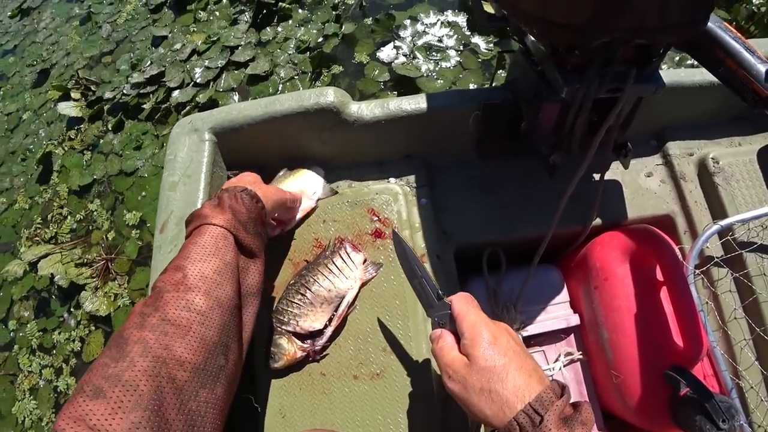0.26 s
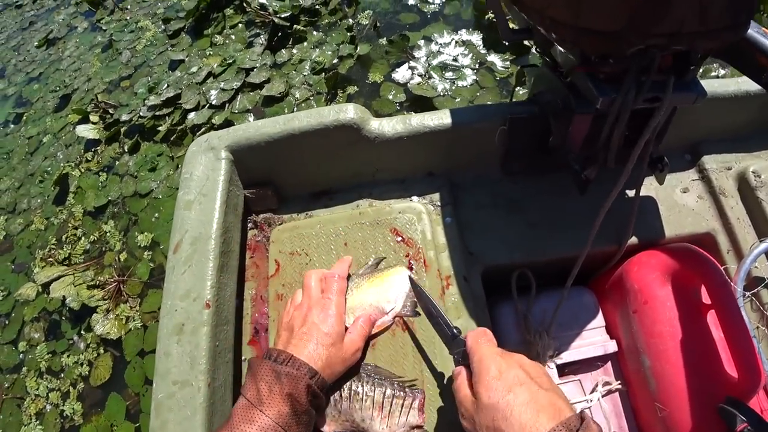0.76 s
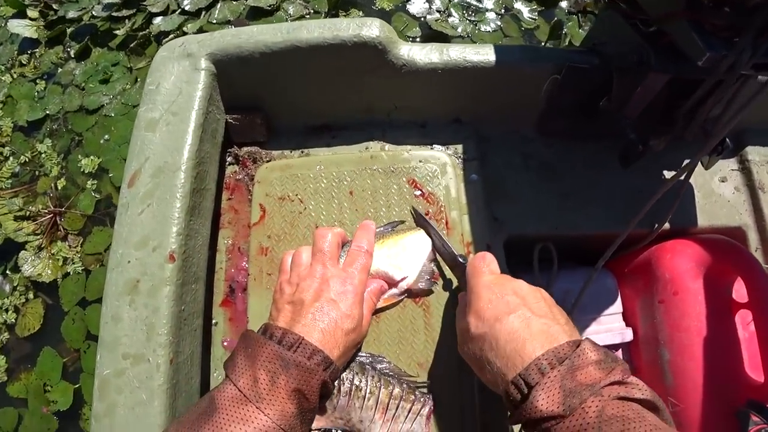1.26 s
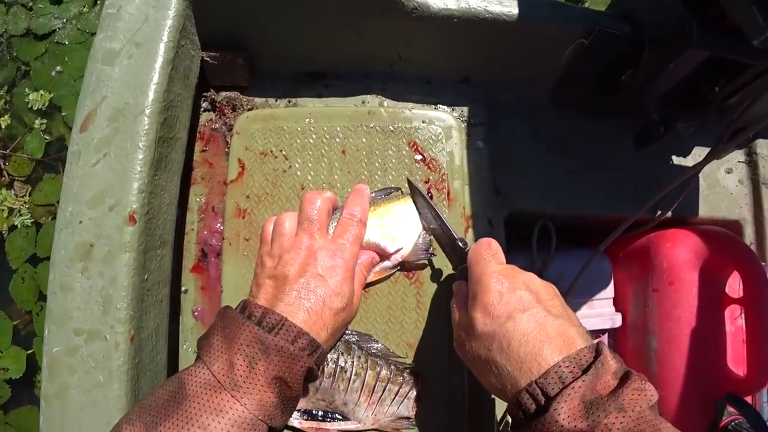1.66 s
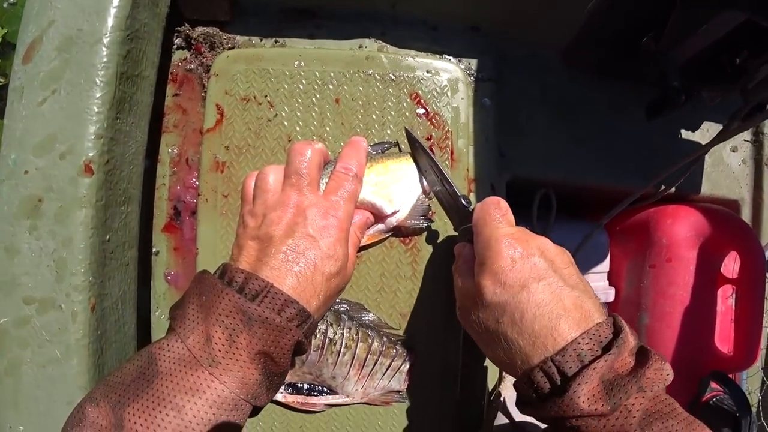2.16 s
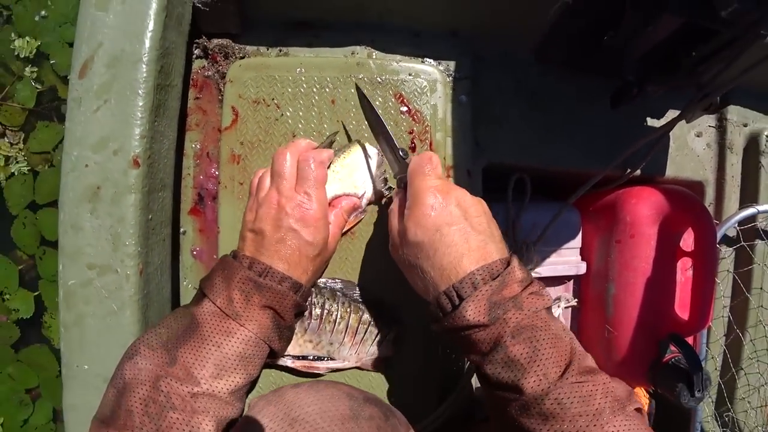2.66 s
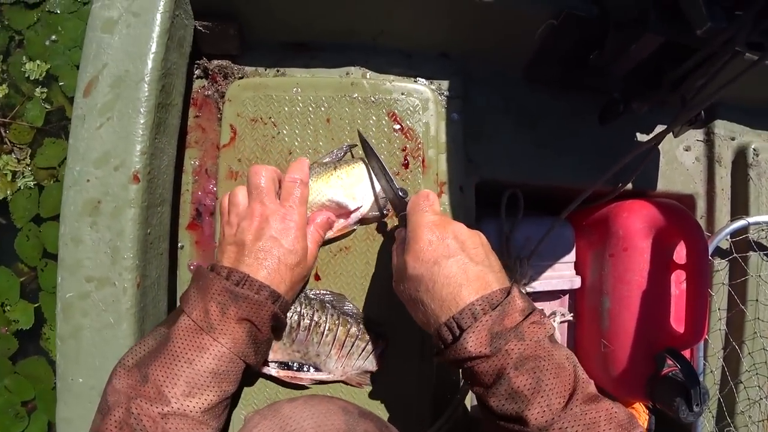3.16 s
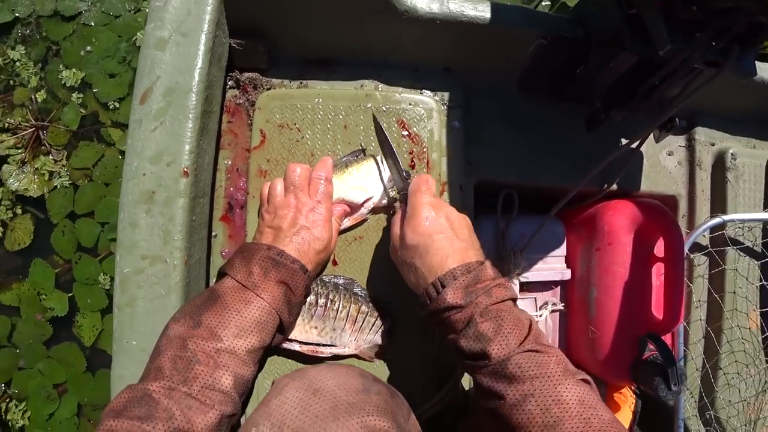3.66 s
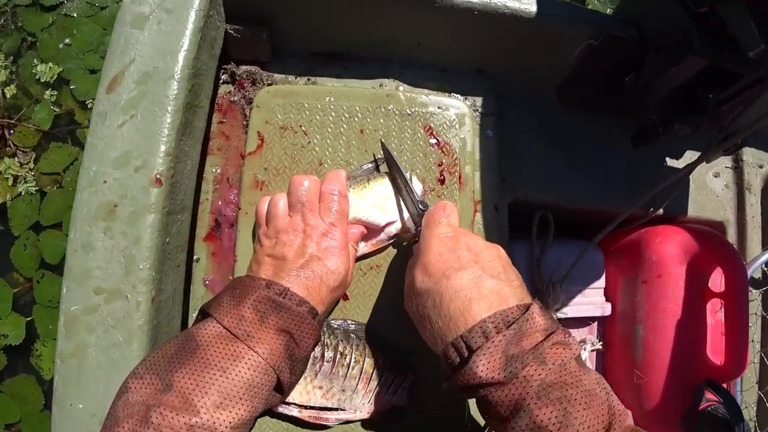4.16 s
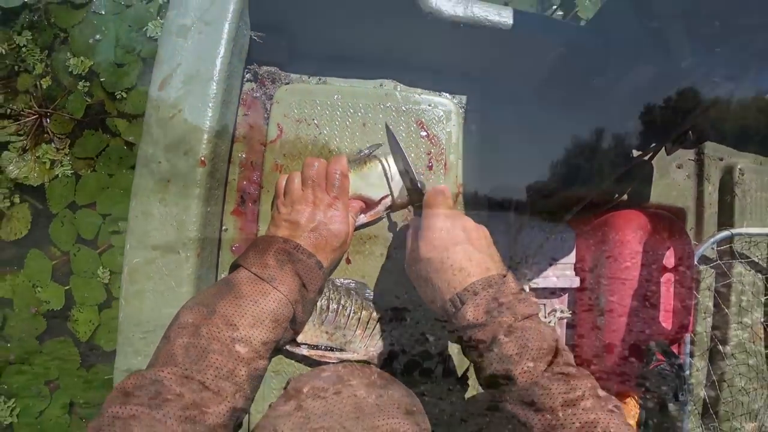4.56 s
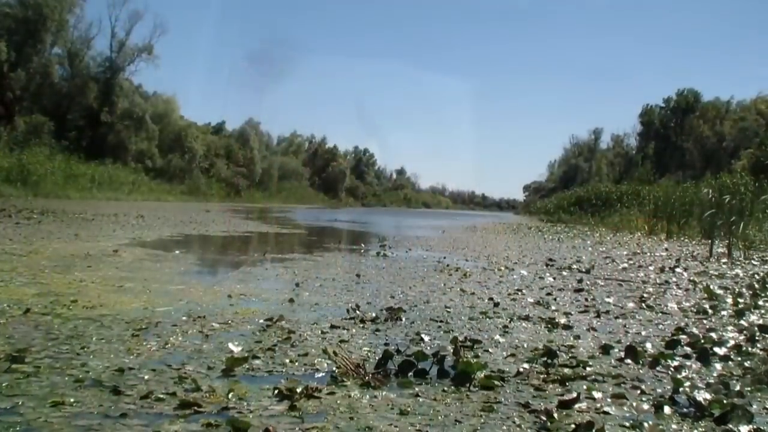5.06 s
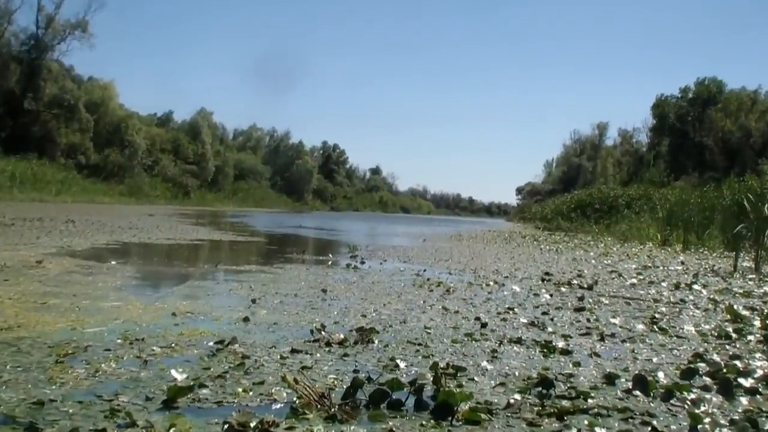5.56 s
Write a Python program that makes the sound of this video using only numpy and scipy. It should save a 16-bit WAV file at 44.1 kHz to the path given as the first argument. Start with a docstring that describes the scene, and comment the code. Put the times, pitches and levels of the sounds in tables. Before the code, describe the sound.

Close to the microphone, hands and a knife work a fish on a hollow plastic boat deck: dull booms, clicks, wet rasps and tiny crackles. The hardest knocks come in bursts roughly a second apart, over faint open marsh air and low wind buffeting. Near the end a steady wash of water fades in, with a few soft rustles and last knocks.

```python
"""On the hollow plastic deck of a small boat, a fish is cut close to the microphone.
Still marsh air and buffeting wind are shaped noise; near the end a louder wash of water along the hull
rises, as if moving through lily pads, with a few soft treble rustles. The knife and hands rub (noise through
the deck and a wet rasp), crackle (tiny snaps), tick (short rings and cracks) and thump (ringing deck modes)."""
import sys
import numpy as np
from scipy import signal
from scipy.fft import rfft, irfft
from scipy.io import wavfile
from scipy.ndimage import uniform_filter1d

SR = 44100
rng = np.random.default_rng(int(sys.argv[2]) if len(sys.argv) > 2 else 0)


def output_pcm(signal):
    """Save a mono or channel-first signal as 16-bit PCM at the path in sys.argv[1].

    Samples are clipped to [-1, 1] before scaling.
    """
    pcm = np.clip(np.atleast_2d(signal).T, -1, 1) * 32767
    wavfile.write(sys.argv[1], SR, np.round(pcm).astype(np.int16))


def natural_amplitude(level_db):
    """Convert a level in decibels to a linear amplitude factor, elementwise."""
    exponent = np.asarray(level_db, float) / 20
    return 10 ** exponent


N = 256072  # length in samples


def evened(x):
    """Scales a sound to rms 1."""
    return x / np.sqrt(np.mean(x ** 2) + 1e-20)


def read(points, hz):
    """Reads a curve of (Hz, value) points on a log-frequency axis."""
    f, value = np.transpose(points)
    return np.interp(np.log(hz + 1), np.log(f + 1), value)


def level(rows):
    """Gain over time from rows of (seconds, dB); nearly silent outside the rows."""
    rows = np.asarray(rows)
    return natural_amplitude(np.interp(np.arange(N) / SR, rows[:, 0], rows[:, 1], -120, -120))


def add(mix, s, sound):
    """Mixes a sound in at time s, in seconds."""
    part = mix[round(s * SR):][:len(sound)]
    part += sound[:len(part)]


def coloured(x, spectrum):
    """Filters x by a spectrum in dB."""
    hz = np.fft.rfftfreq(x.shape[-1], 1 / SR)
    return irfft(rfft(x) * natural_amplitude(read(spectrum, hz)), x.shape[-1])


def noise(spectrum, same, patchy_db, lean=((1, 0), (2, 0)), size=1024):
    """Two channels of random short-time spectra, louder and softer in drifting patches."""
    hz = np.fft.rfftfreq(size, 1 / SR)
    a, b, c, d, patches = rng.standard_normal((4 * N // size + 5, len(hz), 5)).T
    patches = uniform_filter1d(patches, size=8, axis=0)
    patches = evened(uniform_filter1d(patches, size=8, axis=1))
    like = np.clip(read(same, hz), -1, 1)[:, None]
    left = a + 1j * b
    right = like * left + np.sqrt(1 - like ** 2) * (c + 1j * d)
    tilt = read(lean, hz) / 2  # half the left-right difference goes to each channel
    z = np.array([left, right]) * natural_amplitude(read(spectrum, hz)[:, None] + patchy_db * patches)
    z *= natural_amplitude([tilt, -tilt])[:, :, None]
    return evened(signal.istft(z, nperseg=size, noverlap=3 * size // 4)[1][:, :N])


# Colour of the still marsh. Each row: frequency in Hz, relative level in dB per Hz.
AIR_COLOUR = [(59, -17.5), (100, -5.5), (141, -8.5), (360, -15.5), (589, -18.5), (1000, -24.5), (4880, -32),
              (12800, -47), (15500, -50), (16500, -69)]
# How alike left and right are. Each row: frequency in Hz, likeness from 0 to 1.
AIR_LIKENESS = [(60, 0.96), (240, 1), (950, 0.22), (3770, 0.52), (15000, 0.37)]


def marsh_air():
    """Steady, faint noise of the open air, more alike in both channels at low pitches."""
    return natural_amplitude(-44.5) * noise(AIR_COLOUR, AIR_LIKENESS, patchy_db=2.0)


# Strength of the wind. Each row: time in seconds, level in dB.
GUSTS = [(0.0, -46), (0.34, -44), (0.55, -30.5), (0.92, -39.5), (1.62, -50), (1.96, -32.5), (2.42, -37),
         (2.83, -62), (3.43, -59), (3.7, -62), (3.95, -68), (4.3, -39.5), (4.45, -35.5), (4.77, -40),
         (5.06, -38), (5.71, -41.5), (5.81, -38)]
# Colour of the wind. Each row: frequency in Hz, relative level in dB per Hz.
WIND_COLOUR = [(8.8, -44), (15, 1), (49, -4), (161, -14), (198, -18), (231, -9.5), (260, -14.5), (340, -46),
               (570, -120)]


def wind():
    """Wind buffets the microphone ports: low noise that swells and sinks with the gusts."""
    likeness = [(30, 0.6), (120, 0.67)]  # (Hz, left-right likeness)
    return level(GUSTS) * noise(WIND_COLOUR, likeness, patchy_db=2.0, size=2048)


# Colour of the water. Each row: frequency in Hz, relative level in dB per Hz.
WASH_COLOUR = [(35, -37), (60, -9.5), (96, 1.5), (190, -9.5), (283, -3.5), (375, -11.5), (1370, -15.5),
               (6150, -26.5), (9840, -35.5), (15400, -38.5), (16500, -53)]
# Loudness of the water. Each row: time in seconds, level in dB.
WASH_LEVEL = [(4.2, -54), (4.338, -46), (4.508, -36), (5.036, -32.5), (5.81, -32.5)]
# How alike left and right are. Each row: frequency in Hz, likeness from 0 to 1.
WASH_LIKENESS = [(60, 1), (180, 0.99), (550, 0.99), (1650, 0.93), (4970, 0.13), (15000, 0.033)]
# Balance of the two sides. Each row: frequency in Hz, left minus right in dB.
WASH_LEAN = [(60, -8), (240, -2), (950, -1.5), (3770, -0.5), (15000, -2.5)]


def wash():
    """Water runs along the hull: wide, fairly even noise that rises near the end."""
    return level(WASH_LEVEL) * noise(WASH_COLOUR, WASH_LIKENESS, patchy_db=0.7, lean=WASH_LEAN)


# Brief treble rustles over the water. Each row: start in seconds, level at the peak in dB, length in seconds.
RUSTLES = [(4.568, -40, 0.039), (4.647, -44.5, 0.05), (5.255, -38, 0.046), (5.306, -46, 0.047)]


def rustles():
    """Soft bell-shaped swells of noise in a narrow treble band."""
    band = signal.butter(2, [5200, 6900], "bandpass", fs=SR, output="sos")
    hiss = evened(signal.sosfilt(band, rng.standard_normal((2, N))))
    t = np.arange(N) / SR
    swells = sum(natural_amplitude(db) * np.exp(-(2 * (t - s) / length - 1) ** 2 * 2) for s, db, length in RUSTLES)
    return hiss * swells


# Modes (natural pitches) of the deck. Each row: frequency in Hz, relative level in dB,
# basic time in seconds to die away by 60 dB, before the factor given to ring().
DECK_MODES = [(54.7, -12.5, 0.23), (70, -17, 0.42), (88, 7, 0.13), (202, -25, 0.28), (236.2, -14, 0.32),
              (277.7, 0, 0.15), (355, 5, 0.15), (431, -1, 0.14), (465, 8, 0.028), (568, 1.5, 0.04),
              (731, 0.5, 0.078), (819.5, -9, 0.1), (934, -5, 0.077), (1013, -6.5, 0.045), (1125, 8, 0.011),
              (1590, -8, 0.036), (1950, -3.5, 0.02)]


def ring(weight_db, factor, signs, hand=0):
    """The deck modes die away after one blow; the hand share of the decay comes late and fast."""
    hz, db, t60 = np.transpose(DECK_MODES)[:, :, None]
    t = np.arange(SR // 4) / SR
    age = t / (t60 * factor)
    fall_db = 60 * ((1 - hand) * age + hand * (age / 0.42) ** 2)
    modes = signs * natural_amplitude(db + weight_db - fall_db) * np.sin(2 * np.pi * hz * t)
    return modes.sum(0)


def stroke(start, hardest, end, ends_db):
    """Gain of one slide: rounded at its hardest moment, falling to both ends, silent outside."""
    away = np.interp(np.arange(N) / SR, [start, hardest, end], [1, 0, 1], np.inf, np.inf)
    return natural_amplitude(ends_db * away ** 1.16)


# Colour of the wet rasp. Each row: frequency in Hz, relative level in dB per Hz.
RASP_COLOUR = [(500, -6), (900, -1), (1350, -6), (1850, -3), (2100, -8), (2400, -4.5), (2800, -11),
               (3800, -9), (4800, -12), (6300, -13), (8000, -18.5), (12000, -26), (16000, -53)]
# Fish and hands sliding. Each row: start, hardest moment and end in seconds,
# then level through the deck and level of the wet rasp in air, both in dB.
STROKES = [(0.087, 0.14, 3.5, -69, -51), (0.417, 0.509, 0.63, -30.5, -39.5),
           (0.554, 0.62, 0.8, -35.5, -40.5), (0.613, 0.7, 0.76, -32.5, -66),
           (1.228, 1.25, 1.38, -30.5, -38.5), (1.692, 1.691, 1.8, -34.5, -54),
           (2.306, 2.414, 2.93, -39, -45.5), (2.428, 2.441, 2.48, -28.5, -52),
           (2.483, 2.51, 2.56, -23, -30), (2.55, 2.578, 2.586, -18.5, -34), (2.713, 2.739, 2.89, -32, -51),
           (3.118, 3.148, 3.215, -34, -73), (3.257, 3.487, 3.7, -30.5, -43),
           (3.475, 3.484, 3.512, -26, -28.5), (3.613, 3.642, 3.71, -36, -45.5),
           (4.263, 4.325, 4.54, -30, -40), (4.315, 4.322, 4.32, -16, -30)]
DECK_ENDS_DB, RASP_ENDS_DB = -19.5, -23  # both ends of a stroke, against its hardest moment


def rubbing():
    """Uneven slips shake the deck; the rasp flickers in patches as scales catch."""
    jolts = np.minimum(rng.exponential(1, (2, N // 128 + 1)), 3)
    grip_db = 3.3 * jolts.repeat(128, 1)[:, :N]
    # sliding barely moves the whole hull, so the lowest modes stay weak
    slide_colour = [(100, -35), (200, 15.0), (450, 8.5), (1000, -16.0)]
    upper_db = read(slide_colour, np.array(DECK_MODES)[:, :1])
    slips = rng.standard_normal(N) * natural_amplitude(grip_db[0])
    body = evened(signal.oaconvolve(slips, ring(upper_db, 0.34, 1))[:N])
    rasp = noise(RASP_COLOUR, AIR_LIKENESS, patchy_db=2.2, size=256)[0]
    rasp = evened(rasp * natural_amplitude(0.4 * grip_db[1]))
    out = np.zeros(N)
    for *times, deck_db, rasp_db in STROKES:
        out += natural_amplitude(deck_db) * stroke(*times, DECK_ENDS_DB) * body
        out += natural_amplitude(rasp_db) * stroke(*times, RASP_ENDS_DB) * rasp
    return out


# Bands of the wet snaps. Each entry: centre frequency in Hz.
SNAP_BANDS = (1100, 1850, 2100, 2450, 3800, 4700, 6300, 11500)


def crackle():
    """Scales catch during the strokes: tiny snaps in narrow bands, following the rasp's level."""
    snaps_per_s, snaps_db = 300, -3  # rate over all bands together; level against the rasp
    busy = sum(natural_amplitude(rasp_db) * stroke(*times, RASP_ENDS_DB) for *times, _, rasp_db in STROKES)
    out = np.zeros(N)
    for hz in SNAP_BANDS:
        when = rng.random(N) < snaps_per_s / len(SNAP_BANDS) / SR
        spread_db = 1.55 * np.minimum(rng.exponential(1, N), 2)
        sizes = when * natural_amplitude(snaps_db + 0.43 * read(RASP_COLOUR, hz) + spread_db)
        swells = signal.oaconvolve(sizes, signal.windows.hann(200))[:N]
        band = signal.butter(2, [0.9 * hz, 1.1 * hz], "bandpass", fs=SR, output="sos")
        out += swells * evened(signal.sosfilt(band, rng.standard_normal(N)))
    return busy * out


# Colour of a click's crack. Each row: frequency in Hz, relative level in dB per Hz.
CRACK_COLOUR = [(590, -61.5), (1000, 0), (1780, 4.5), (5050, 1), (7610, -2.5), (9290, -11.5), (11000, -9),
                (15500, -20), (16800, -60)]
# Blade, scales and bones clicking. Each row: start in seconds, peak level in dB, pitch of the ring in Hz,
# share of ring against crack from 0 to 1, time in seconds for the click's envelope to fall by 60 dB.
TICKS = [(0.2682, -28, 5600, 0.43, 0.02), (0.345, -38, 10500, 0.37, 0.019), (0.5, -25, 2440, 0.38, 0.03),
         (0.507, -26, 5850, 0.44, 0.039), (0.55, -26, 5500, 0.2, 0.0058), (0.604, -35, 1960, 0.8, 0.26),
         (0.734, -32.5, 3130, 0.65, 0.021), (0.761, -32, 2600, 0.4, 0.0294),
         (0.8962, -31.5, 2860, 0.3, 0.032), (1.2258, -5, 7980, 0.23, 0.012),
         (1.2265, -13, 1720, 0.5, 0.021), (1.243, -31.5, 2410, 0.9, 0.3), (1.512, -33, 7160, 0.72, 0.016),
         (1.598, -33.5, 1590, 0.56, 0.02), (1.6925, -27.5, 1490, 0.52, 0.03),
         (1.724, -35, 9150, 0.23, 0.02), (1.776, -35, 1860, 0, 0.035), (2.039, -28.5, 3220, 0.2, 0.024),
         (2.076, -32, 1410, 0.35, 0.063), (2.279, -29.5, 1800, 0.34, 0.028),
         (2.428, -9.5, 6090, 0.57, 0.02), (2.4284, -21, 9570, 0.84, 0.0082),
         (2.4289, -8.5, 1564, 0.78, 0.017), (2.4618, -17, 4500, 0.24, 0.011), (2.488, -17, 1010, 0.9, 0.1),
         (2.489, -22.5, 3800, 0.4, 0.04), (2.503, -23, 3880, 0.66, 0.081), (2.556, -31, 3860, 0.7, 0.04),
         (2.574, -25, 3440, 0.43, 0.025), (2.6033, -24, 11620, 0.52, 0.015),
         (2.6128, -30, 1950, 0.7, 0.024), (2.63, -29, 3180, 0.37, 0.017), (2.661, -36, 1690, 0.5, 0.02),
         (2.684, -34.5, 4900, 0, 0.015), (2.772, -35, 4560, 0.05, 0.043), (2.9676, -25, 4280, 0.5, 0.017),
         (2.971, -27.5, 1400, 0.4, 0.027), (3.3402, -29.5, 1650, 0.44, 0.026),
         (3.3693, -35, 1630, 0.37, 0.03), (3.4057, -31.5, 2070, 0.34, 0.021),
         (3.4466, -29.5, 4350, 0.45, 0.025), (3.4742, -17, 1390, 0, 0.047),
         (3.4804, -10, 1780, 0.67, 0.024), (3.48, -18, 3750, 0.72, 0.035), (3.491, -33.5, 3260, 0.6, 0.038),
         (3.5227, -15, 1180, 0.44, 0.026), (3.5234, -20.5, 10300, 0.6, 0.0074),
         (3.541, -27, 2160, 0.6, 0.016), (3.543, -33, 4400, 0.8, 0.016), (3.5655, -40, 3400, 0.6, 0.018),
         (3.659, -33.5, 11000, 0.14, 0.025), (3.7678, -35, 1800, 0.5, 0.039),
         (3.983, -34, 2040, 0.2, 0.025), (4.015, -48, 11500, 0.6, 0.012),
         (4.1088, -35.5, 1540, 0.35, 0.026), (4.1934, -44, 8600, 0.7, 0.014),
         (4.2378, -41, 8000, 0.5, 0.012), (4.32, -13, 2260, 0.38, 0.037), (4.327, -12.5, 1054, 0.66, 0.038),
         (4.341, -21, 1950, 0.3, 0.025), (4.383, -28, 1950, 0, 0.015), (4.508, -25.5, 4860, 0.24, 0.028),
         (4.821, -26.5, 1410, 0.95, 0.036), (5.0207, -20, 2080, 0.5, 0.022),
         (5.4857, -25, 2380, 0.45, 0.029)]


def ticks():
    """Each click is a burst of wide crack plus a short ring of its own pitch."""
    clean_s = 0.06  # from this fall time on, the ring is all fuzzy
    out, t = np.zeros(N), np.arange(4096) / SR
    bursts = rng.standard_normal((len(TICKS), 2, len(t)))
    for (s, db, hz, share, t60), burst in zip(TICKS, bursts):
        shape = natural_amplitude(-60 * t / t60) * np.minimum(t / (0.074 * t60), 1) ** 2
        r = np.exp(-np.pi * (300 + 0.074 * hz) / SR)  # higher rings are wider
        poles = [1, -2 * r * np.cos(2 * np.pi * hz / SR), r * r]
        fuzzy = signal.lfilter([1, 0, -1], poles, burst[0] * shape ** 2)
        fuzzy = signal.lfilter([1, 0, -1], poles, fuzzy)
        # one short tap rings clean, a longer contact is a chain of slips
        fuzz = 1 - share ** 2 * (1 - min(t60 / clean_s, 1) ** 2)
        clean = shape * np.sin(2 * np.pi * hz * t)
        tone = fuzz * fuzzy / abs(fuzzy).max() + (1 - fuzz) * clean
        # the contact chatters from millisecond to millisecond
        rattle = natural_amplitude(2.7 * burst[0, :len(t) // 64].repeat(64))
        crack = coloured(burst[1], CRACK_COLOUR) * shape * rattle
        click = share * tone / abs(tone).max() + (1 - share) * crack / abs(crack).max()
        add(out, s, natural_amplitude(db) * click / abs(click).max())
    return out


# Blows on the deck; the lowest rock the whole hull. Each row: start in seconds, peak level of the boom in dB,
# frequency in Hz of the mode nearest the struck spot, hardness (peak of the upper modes against the boom)
# in dB, factor on how long the deck rings.
THUMPS = [(0.27, -27, 288, -3, 0.45), (0.333, -28, 57.3, -27, 1.3), (0.462, -26, 46, -16, 0.58),
          (0.877, -21, 46, -44, 0.13), (1.059, -29, 70, -26, 0.74), (1.214, -21.5, 272, -10, 0.5),
          (1.2269, -10.5, 278, -10, 0.46), (1.237, -22.5, 347, 7.5, 1.85), (1.251, -17, 223, -9, 0.56),
          (1.275, -22, 240, -10, 0.66), (1.343, -26.5, 286, -30, 0.42), (1.506, -25, 88, -20, 0.86),
          (1.516, -25, 194, -29, 0.32), (1.596, -25.5, 247, -7.5, 0.41), (1.693, -16.5, 275, -1.5, 0.25),
          (1.731, -28, 240, -6, 0.79), (1.775, -27.5, 381, 2, 0.89), (2.04, -26.5, 297, -2, 0.62),
          (2.084, -28.5, 366, -3.5, 0.86), (2.089, -26, 54, -8, 0.49), (2.228, -29, 46.4, -22, 0.61),
          (2.282, -26, 266, -1, 0.44), (2.432, -25, 365, -14, 0.3), (2.48, -14.5, 234, -12, 0.66),
          (2.499, -9.5, 268, -18, 0.93), (2.516, -6.5, 272, -13, 0.45), (2.535, -14.5, 250, -3.5, 0.7),
          (2.575, -18, 238, 4.5, 0.89), (2.598, -24.5, 253, -1.5, 0.83), (2.73, -36, 278, 7, 0.23),
          (2.755, -33.5, 315, 3, 0.74), (2.969, -28, 90, -20, 1.6), (2.976, -15, 252, -10.5, 0.4),
          (3.173, -27, 200, -5.5, 0.33), (3.213, -23, 94, -30, 0.6), (3.228, -31.5, 172, 1.5, 0.34),
          (3.34, -24, 228, 8, 0.17), (3.368, -28.5, 251, 1.5, 0.23), (3.405, -27, 355, -1, 0.23),
          (3.475, -22.5, 347, 12.5, 1.6), (3.476, -19.5, 86, -30, 0.84), (3.487, -6.5, 275, -21, 0.67),
          (3.5165, -10, 277, -6, 0.71), (3.528, -12, 285, -10, 0.28), (3.604, -30, 272, 3.5, 0.32),
          (3.648, -30, 253, -1, 0.6), (3.767, -27.5, 245, 5.5, 0.36), (3.941, -30.5, 70, -30, 0.13),
          (3.982, -32, 173, 7.5, 0.39), (4.001, -23, 272, -12, 0.21), (4.13, -28.5, 262, -7.5, 0.22),
          (4.321, -18.5, 62.3, -45, 0.74), (4.3193, -15, 280, 7, 1.55), (4.326, -14.5, 350, 1, 0.78),
          (4.335, -6, 232, -5, 0.31), (4.346, -11.5, 270, -7, 0.29), (4.364, -19.5, 350, -1, 0.33),
          (4.3842, -14, 274, -6.5, 0.36), (4.512, -31, 236, -1, 0.58), (4.969, -13.5, 242.5, -14.5, 0.99),
          (4.986, -24, 259, 1.5, 0.65), (5.023, -16, 263, -4.5, 0.56)]


def thumps():
    """A blow favours the low mode near its spot; a hard blow also wakes the upper modes."""
    press_cycles = 0.62  # a blow swells in over this many cycles of its mode
    hand = 0.55  # share of a boom's decay that comes late and fast, as flesh settles on the deck
    out, t = np.zeros(N), np.arange(SR // 4) / SR
    hz = np.array(DECK_MODES)[:, :1]
    low = hz < 400
    signs = rng.choice([-1., 1.], (len(THUMPS), len(DECK_MODES), 1))
    for (s, db, spot_hz, hard_db, factor), sign in zip(THUMPS, signs):
        # flesh and plastic yield, so the ring swells in
        press = 1 - np.exp(-(t / (press_cycles / spot_hz)) ** 2)
        near_spot_db = np.where(low, -45 * abs(np.log2(hz / spot_hz)), -200)
        boom = press * ring(near_spot_db, factor, 1, hand)
        clack = np.sqrt(press) * ring(np.where(low, -200, 0), factor, sign)
        add(out, s, natural_amplitude(db) * boom / abs(boom).max())
        add(out, s, natural_amplitude(db + hard_db) * clack / abs(clack).max())
    return out


# Stereo difference of near sounds. Each row: frequency in Hz, side against middle in dB.
PORT_SIDE = [(60, -35), (180, -34), (550, -14), (1650, -14), (4970, -18.5), (15000, -10)]


def ports(near):
    """Near sounds reach the two ports almost alike; the difference is a short scattered echo."""
    t = np.arange(1024) / SR
    scatter = rng.standard_normal(1024) * natural_amplitude(-60 * t / 0.014)  # falls 60 dB in 14 ms
    echo = signal.oaconvolve(near, scatter / np.linalg.norm(scatter))[:N]
    side = coloured(echo, PORT_SIDE)
    return np.array([near + side, near - side])


def scene():
    """Marsh air, wind, water and rustles behind the work on the deck."""
    background = marsh_air() + wind() + wash() + rustles()
    deck_work = rubbing() + crackle() + ticks() + thumps()
    return background + ports(deck_work)


def band_limit(x):
    """A steep low-pass at the top of the band."""
    return signal.sosfilt(signal.butter(12, 16800, fs=SR, output="sos"), x)


def record(dry):
    """Passes on the finished mix as it is heard."""
    return band_limit(dry)


dry = scene()
out = record(dry)
output_pcm(out)
```